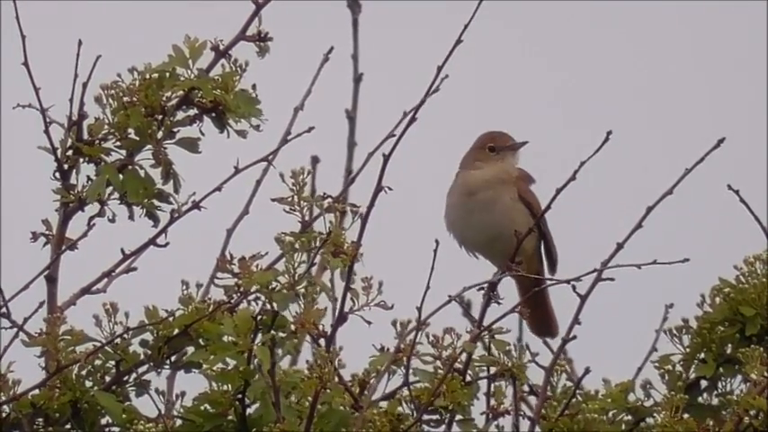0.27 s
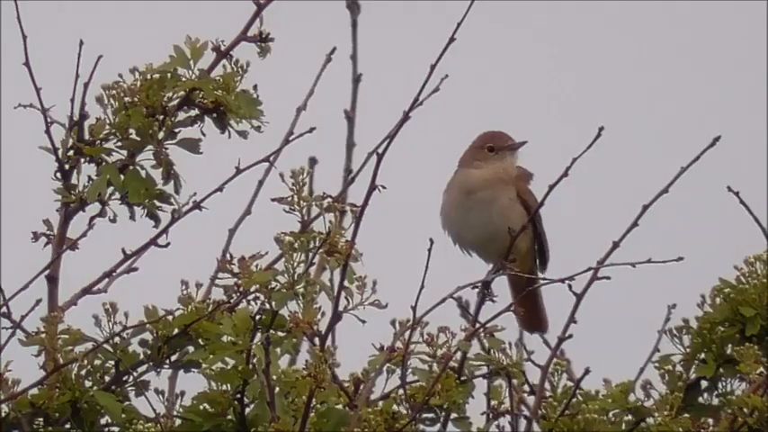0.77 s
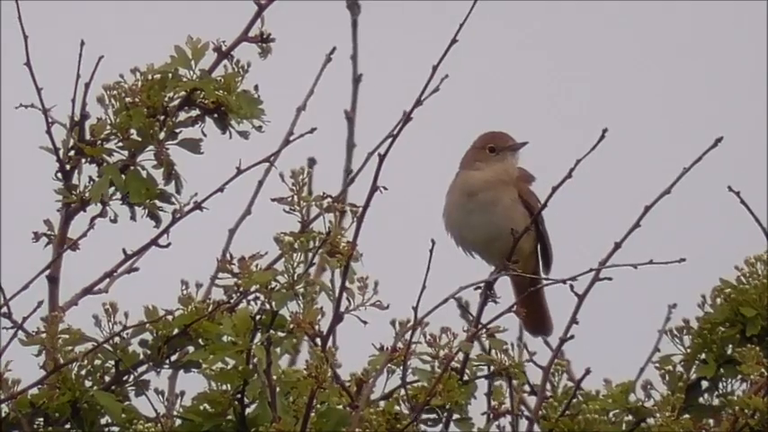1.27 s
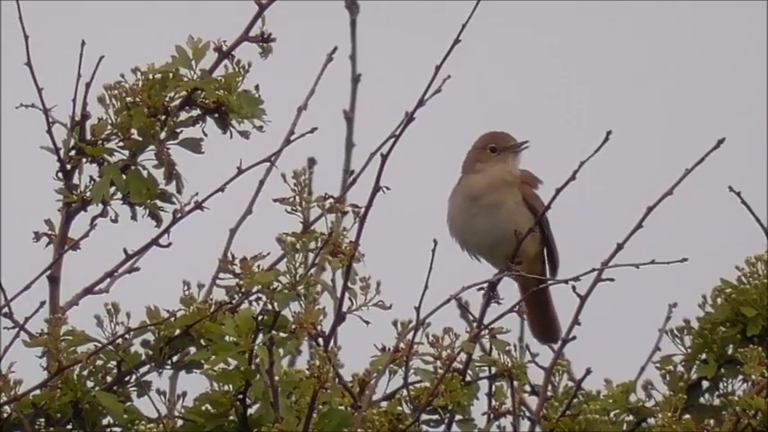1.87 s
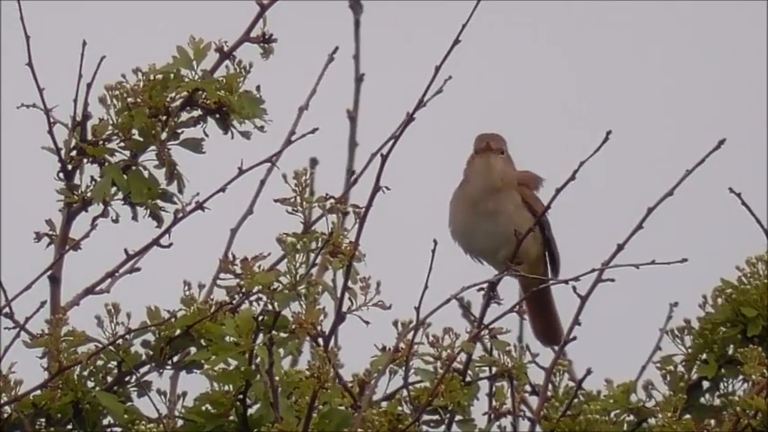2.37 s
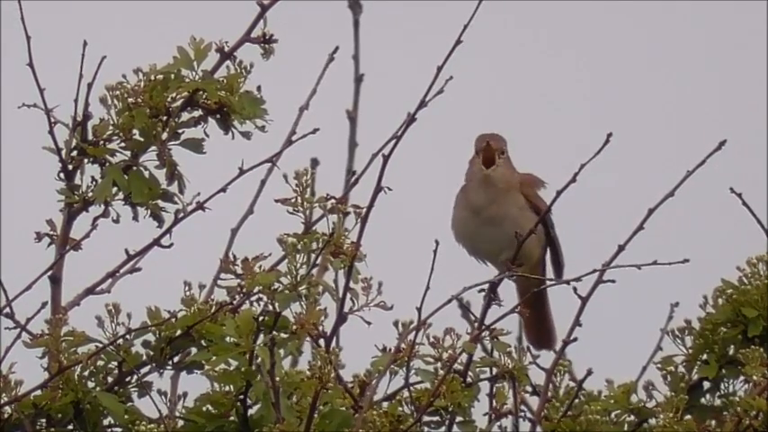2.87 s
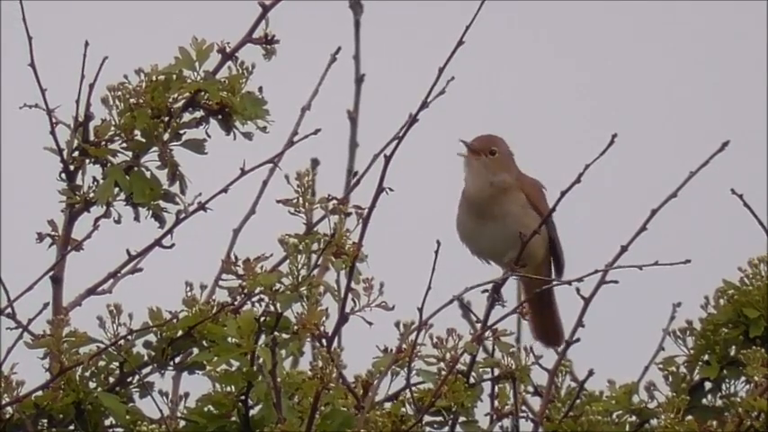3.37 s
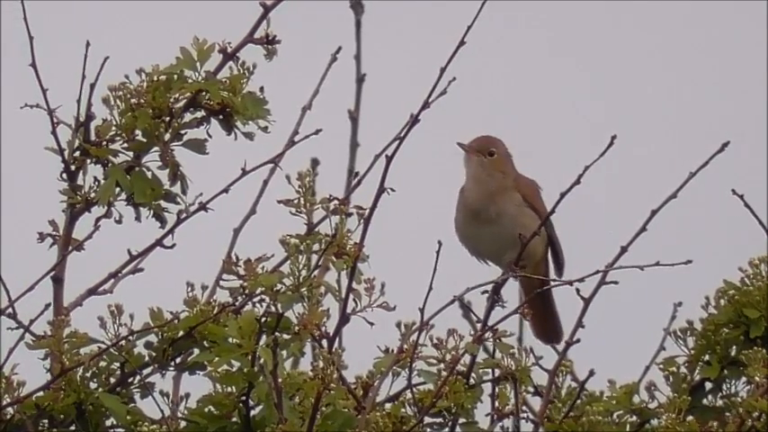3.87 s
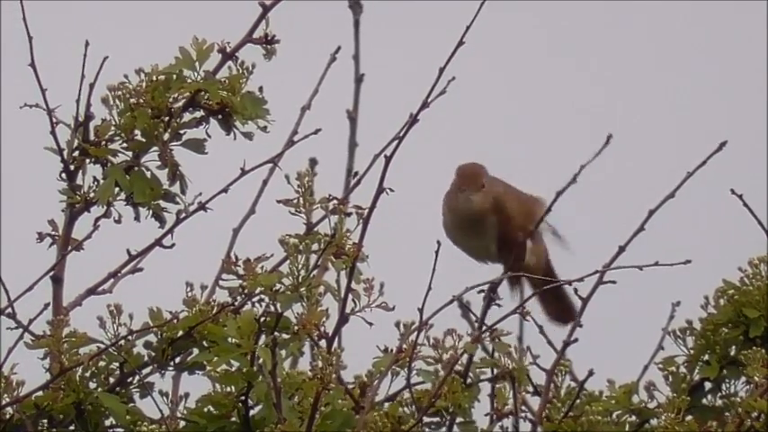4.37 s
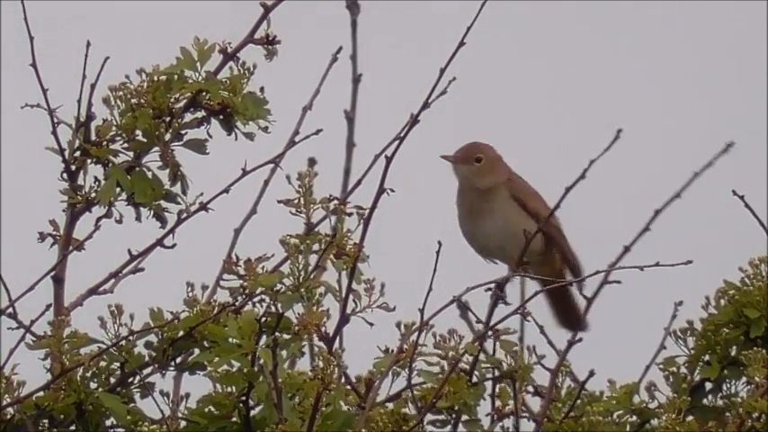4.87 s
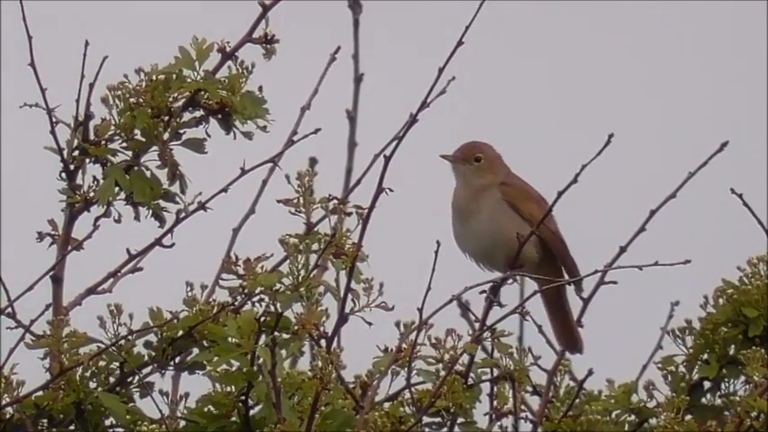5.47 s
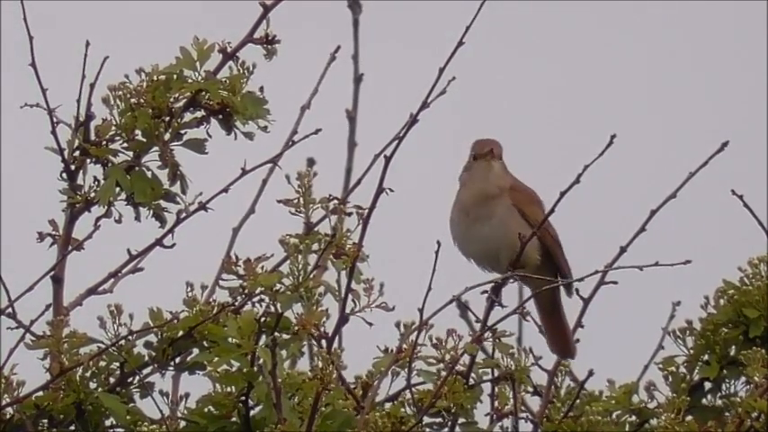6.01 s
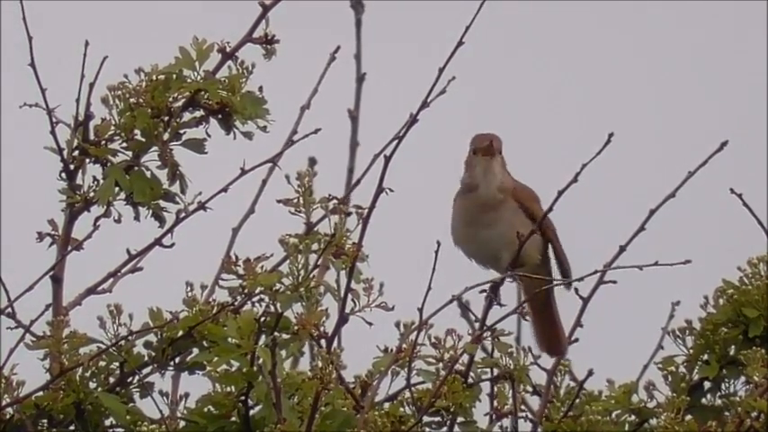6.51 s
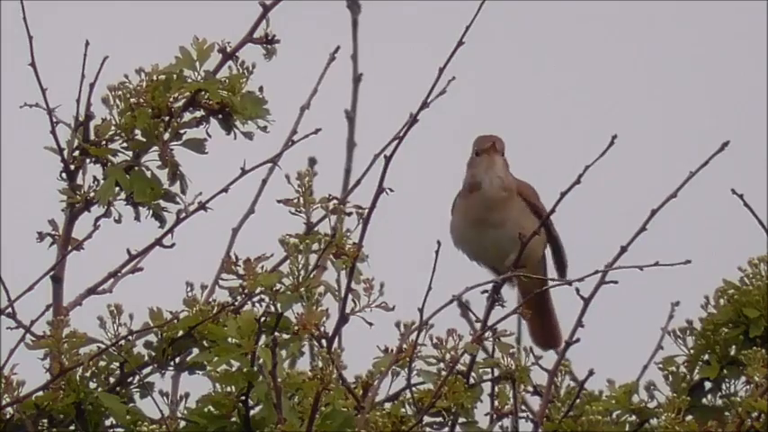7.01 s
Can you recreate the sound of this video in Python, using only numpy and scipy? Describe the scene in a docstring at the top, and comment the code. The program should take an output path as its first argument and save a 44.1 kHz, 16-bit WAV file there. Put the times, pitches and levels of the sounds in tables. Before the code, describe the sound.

A nightingale on top of a nearby hedge sings two short phrases with a pause between them. The first has a rising whistle, a rapid clicking trill and swinging notes; the second has whistles, buzzes and clipped chucks. Before it starts, a fainter warbler runs through a descending song. Distant birds chirp throughout, while gusts of wind rumble low on the microphone over a soft outdoor hiss.

```python
"""Wind rumbles on the microphone over soft hiss and distant birds; a warbler sings a falling cadence.
Then a nightingale, close by on top of a hedge, sings two phrases of whistles and buzzes,
the first with a fast trill. Each note is a gliding near-sine from the bird's syrinx;
the nightingale's beak lets overtones through, and its voice rasps when pushed.
The foliage scatters every note."""
import sys
import numpy as np
from scipy import signal
from scipy.fft import rfft, irfft
from scipy.io import wavfile
from scipy.ndimage import uniform_filter1d

SR = 44100
rng = np.random.default_rng(int(sys.argv[2]) if len(sys.argv) > 2 else 0)


def bounce(signal):
    """Save signal as a 16-bit WAV file at the path given by the first command-line argument."""
    frames = np.transpose(np.atleast_2d(signal))
    limited = np.clip(frames, -1, 1)
    pcm = np.round(limited * 32767).astype(np.int16)
    wavfile.write(sys.argv[1], SR, pcm)


N = 319725
TIME = np.arange(N) / SR


def amp(db):
    """Decibels to gain."""
    return 10 ** (np.asarray(db) / 20)


def unit_rms(x):
    """Scale to unit power."""
    return x / np.sqrt(np.mean(x ** 2) + 1e-20)


def at_hz(points, hz, column=1):
    """Read a table column along log frequency."""
    table = np.array(points, float)
    return np.interp(np.log(np.maximum(hz, 1)), np.log(table[:, 0]), table[:, column])


def add(track, start_s, sound):
    """Mix a sound into a track."""
    i = int(np.clip(round(start_s * SR), 0, N))
    track[i:i + len(sound)] += sound[:N - i]


def drift(rate_hz, size):
    """Smooth random wavering, spread about 1."""
    steps = np.arange(size) * rate_hz / SR
    return np.interp(steps, np.arange(4000), rng.standard_normal(4000))


def noise(spectrum, channels):
    """Independent noises of one colour, falling 15 dB per octave beyond its ends."""
    hz = np.maximum(np.arange(N // 2 + 1) * SR / N, 1)
    octaves_outside = np.abs(np.log2(hz / np.clip(hz, spectrum[0][0], spectrum[-1][0])))
    colour = amp(at_hz(spectrum, hz) - 15 * octaves_outside)
    return unit_rms(irfft(rfft(rng.standard_normal((channels, N))) * colour, N))


def course(length_s):
    """Share of a note gone by, per sample."""
    return np.linspace(0, 1, int(length_s * SR))


def fade(size, edge_s):
    """Equal soft onset and ending."""
    i = np.arange(size)
    return np.sin(np.pi / 2 * np.clip(np.minimum(i, i[::-1]) / (edge_s * SR), 0, 1)) ** 2


def swell(length_s, attack_s, release_s):
    """Attack, hold, release."""
    t = course(length_s) * length_s
    attack = np.sin(np.pi / 2 * np.clip(t / attack_s, 0, 1))
    release = np.sin(np.pi / 2 * np.clip((length_s - t) / release_s, 0, 1))
    return (attack * release) ** 2


def fall(length_s, from_hz, to_hz, settling):
    """Pitch that drops fast, then settles."""
    return to_hz + (from_hz - to_hz) * (1 - course(length_s)) ** settling


def phase_of(pitch_hz, jitter):
    """Phase of a slightly unsteady oscillator."""
    return 2 * np.pi * np.cumsum(pitch_hz * (1 + jitter * drift(900, len(pitch_hz)))) / SR


def treble_limit(hz):
    """Gain that fades an overtone out from 15 to 17 kHz."""
    return np.clip((17000 - hz) / 2000, 0, 1)


def call(length_s, from_hz, to_hz, rate_hz, swing, jitter=0.0071):
    """A small bird's glide with vibrato."""
    size = int(length_s * SR)
    vibrato = 1 + swing * np.cos(2 * np.pi * rate_hz * np.arange(size) / SR)
    pitch = np.geomspace(from_hz, to_hz, size) * vibrato
    return np.sin(phase_of(pitch, jitter)) * fade(size, length_s / 3)


# rumble spectrum: frequency_hz, relative_density_db
WIND_SPECTRUM = [(13, -50), (22, -28.5), (75, -1), (140, 1), (252, -7.5), (900, -42.5), (1170, -53.5),
                 (1980, -120)]
# rumble balance: time_s, low_relative_db, upper_relative_db
WIND_BALANCE = [(0.0, -33, -52), (0.16, -33, -47), (2.5, -38, -53), (3.37, -29, -46), (3.45, -34, -53),
                (4.93, -41, -56), (5.33, -35, -50), (6.84, -36, -53), (7.25, -31, -45)]
# gust strength: time_s, relative_level_db
WIND_GUSTS = [(0.0, -33.5), (0.28, -32), (0.32, -36.5), (0.55, -33.5), (1.17, -32.5), (1.19, -40.5),
              (1.45, -32.5), (1.84, -38), (1.88, -44.5), (1.96, -37), (2.22, -41), (2.42, -33),
              (2.52, -40.5), (2.56, -33), (2.6, -40.5), (2.71, -33.5), (2.77, -40.5), (2.97, -29.5),
              (3.01, -40.5), (3.13, -26), (3.71, -37.5), (3.86, -31.5), (3.94, -44), (4.02, -36.5),
              (4.64, -40), (4.76, -46.5), (5.23, -33), (5.27, -38.5), (5.31, -30), (5.39, -39.5),
              (5.47, -28.5), (5.59, -44.5), (5.73, -31), (5.77, -41.5), (5.88, -32), (5.94, -40.5),
              (6.0, -33), (6.06, -40.5), (6.14, -31.5), (6.24, -43), (6.3, -30), (6.42, -46.5),
              (6.44, -31.5), (6.6, -36.5), (6.64, -28), (6.68, -37), (7.19, -31.5), (7.25, -32.5)]

def wind(gain_db=11, pan_db=-5, own_db=-15, split_hz=280, lump_hz=30, lump_db=1.15, upper_lump_db=4):
    """Eddies push the two capsules in opposite senses; the upper rumble comes in lumps."""
    shared, left, right = noise(WIND_SPECTRUM, channels=3)
    opposed = shared * amp([[pan_db / 2], [-pan_db / 2]]) * [[1], [-1]]
    rumble = opposed + amp(own_db) * np.array([left, right])
    low = signal.sosfiltfilt(signal.butter(2, split_hz, fs=SR, output="sos"), rumble)
    time_s, low_db, upper_db = np.transpose(WIND_BALANCE)
    tilt_db = upper_db - low_db
    bright_db = np.interp(TIME, time_s, tilt_db - tilt_db.mean()) + upper_lump_db * drift(lump_hz, N)
    rumble = low + (rumble - low) * amp(bright_db)
    running_rms = np.sqrt(uniform_filter1d(np.mean(rumble ** 2, axis=0), int(.08 * SR)))
    gust_db = np.interp(TIME, *np.transpose(WIND_GUSTS))
    return rumble / running_rms * amp(gain_db + gust_db + lump_db * drift(lump_hz, N))


# hiss spectrum: frequency_hz, relative_density_db
AIR_SPECTRUM = [(280, -29), (480, -2.5), (571, -3), (701, -10), (1310, -14), (1700, -19), (2020, -18.5),
                (2630, -24), (3670, -16.5), (4500, -18.5), (6200, -29), (8060, -24.5), (8420, -24.5),
                (12600, -24), (15500, -29.5)]

def air(shared_db=-61, own_db=-60, whine_db=-76, whine_hz=7880):
    """Soft outdoor hiss with a faint high whine."""
    shared, left, right = noise(AIR_SPECTRUM, channels=3)
    hiss = amp(shared_db) * shared + amp(own_db) * np.array([left, right])
    return hiss + amp(whine_db) * np.sin(phase_of(np.full(N, whine_hz), jitter=.01))


def chorus(count=210, low_hz=2400, high_hz=5000, relative_db=-61, spread_db=8, max_glide_octaves=.6):
    """Many faint birds give arched glides at random."""
    out = np.zeros(N)
    for when, height, slope, duration, loud in rng.random((count, 5)):
        hz = low_hz * (high_hz / low_hz) ** height
        bend = 2 ** (max_glide_octaves * (slope - .5))
        length_s = .04 + .08 * duration
        note = call(length_s, hz / bend, hz * bend, rate_hz=1 / length_s, swing=-.0498)
        add(out, when * N / SR, amp(relative_db + spread_db * (loud - .5)) * note)
    return out


def chatter(count=90, spacing_s=.081, length_s=.0287, pitch_hz=2100, relative_db=-56):
    """One faint bird repeats a low note unevenly."""
    out = np.zeros(N)
    for k, (late, height, loud) in enumerate(rng.standard_normal((count, 3))):
        hz = pitch_hz * (1 + .0425 * height)
        note = call(length_s, hz * 1.05, hz / 1.05, rate_hz=15, swing=.0059)
        add(out, k * spacing_s + .017 * late, amp(relative_db + 3 * loud) * note)
    return out


# repeated chirps: start_s, count, spacing_s, length_s, from_hz, to_hz, relative_level_db
FAR_CHIRPS = [(.111, 4, .0765, 0.035, 3200, 1700, -55.5), (4.402, 3, 0.15, .082, 2900, 4950, -57.5),
              (4.392, 3, .164, .032, 2500, 1800, -52.5)]

def far_chirps():
    """Distant birds each repeat one glide."""
    out = np.zeros(N)
    for start_s, count, spacing_s, length_s, from_hz, to_hz, db in FAR_CHIRPS:
        for k in range(count):
            chirp = call(length_s, from_hz, to_hz, rate_hz=10.4, swing=.017)
            add(out, start_s + k * spacing_s, amp(db) * chirp)
    return out


# clicks and knocks: start_s, band_hz, level_db, decay_s
TICK_BURSTS = [(.202, 945, -40, 0.0037), (.926, 6550, -44, 0.0009), (2.662, 10000, -49, .001),
               (4.793, 970, -38.5, 0.0047), (5.734, 4330, -48, .004), (6.524, 9000, -52, .001),
               (6.532, 9000, -53, .001)]

def ticks():
    """Clicks and soft knocks: fast-decaying bands of noise."""
    out, t = np.zeros(N), np.arange(SR // 20) / SR
    for start_s, hz, db, decay_s in TICK_BURSTS:
        band = signal.butter(2, [hz / 1.4, hz * 1.07], "band", fs=SR, output="sos")
        burst = unit_rms(signal.sosfilt(band, rng.standard_normal(len(t))))
        add(out, start_s, amp(db) * burst * np.exp(-t / decay_s))
    return out


def contour(points, edge_s):
    """Start, pitch and gain of a note; the muscles round off the corners of the pitch."""
    time_s, hz, db = np.transpose(points)
    t = np.arange(time_s[0] - .001, time_s[-1] + .001, 1 / SR)
    rounding_samples = int(.25 * np.median(np.diff(time_s)) * SR)
    pitch = uniform_filter1d(np.interp(t, time_s, hz), rounding_samples, mode="nearest")
    return t[0], pitch, amp(np.interp(t, time_s, db)) * fade(len(t), edge_s)


# falling slides: start_s, length_s, from_hz, to_hz, relative_level_db
WARBLER_SLIDES = [(.24, .075, 6470, 4800, -65), (.388, 0.083, 6860, 4700, -56),
                  (0.539, 0.082, 7070, 4720, -53), (1.652, .018, 7300, 4000, -55),
                  (1.87, .052, 4060, 2880, -52), (2.086, .026, 4480, 4140, -46.5),
                  (2.166, 0.056, 4470, 2820, -48.5)]
# repeated hooked note: start_s, relative_level_db
WARBLER_HOOKS = [(0.698, -46), (0.81, -44), (.923, -42), (1.04, -42), (1.151, -42.5)]
# course of one hook: length_share, pitch_hz, relative_level_db
HOOK_SHAPE = [(0, 4880, -12), (.22, 5030, -5), (.42, 5240, -5), (.58, 4970, -1), (.8, 3720, -4),
              (1, 3150, -15)]
# held, then rising: start_s, length_s, held_share, low_hz, high_hz, hold_relative_db, swoop_relative_db
WARBLER_SWOOPS = [(1.271, 0.12, 0.37, 3610, 6220, -49, -46), (1.457, 0.12, 0.33, 3640, 6200, -48, -50),
                  (1.677, 0.041, 0, 4170, 6060, -51, -47), (1.788, 0.11, 0.23, 3030, 3930, -56.5, -48.5),
                  (1.997, 0.098, 0.5, 3050, 4820, -54, -46.5), (2.111, 0.018, 0.022, 4000, 5350, -52, -44),
                  (2.391, .108, .75, 3050, 4500, -57.5, -49.5)]

def warbler(hook_s=.06, swoop_curve=1.4, swoop_edge_s=.0099, flicker_db=2.5):
    """A cadence of pure notes: slides, a repeated hook, then upward swoops among more slides."""
    notes = []
    for start_s, length_s, from_hz, to_hz, db in WARBLER_SLIDES:
        gain = amp(db) * swell(length_s, attack_s=.43 * length_s, release_s=.19 * length_s)
        notes.append((start_s, fall(length_s, from_hz, to_hz, settling=1.1), gain))
    for start_s, db in WARBLER_HOOKS:
        points = [(start_s + share * hook_s, hz, db + shape_db) for share, hz, shape_db in HOOK_SHAPE]
        notes.append(contour(points, edge_s=.0032))
    for start_s, length_s, held, low_hz, high_hz, hold_db, swoop_db in WARBLER_SWOOPS:
        rise = np.clip((course(length_s) - held) / (1 - held), 0, 1)
        db = hold_db + (swoop_db - hold_db) * np.sqrt(rise)
        gain = amp(db) * swell(length_s, swoop_edge_s, swoop_edge_s)
        notes.append((start_s, low_hz + (high_hz - low_hz) * rise ** swoop_curve, gain))
    out = np.zeros(N)
    for start_s, pitch, gain in notes:
        flicker = amp(flicker_db * drift(112, len(pitch)))
        add(out, start_s, gain * flicker * np.sin(phase_of(pitch, jitter=.0093)))
    return out


# runs of pips: start_s, count, spacing_s, first_hz, last_hz, relative_level_db
FAR_PIPS = [(.955, 4, 0.082, 8930, 8850, -55.5), (2.508, 2, 0.063, 8700, 8770, -50.5),
            (4.204, 8, .059, 8780, 8080, -57.5), (4.681, 4, .036, 7170, 6730, -59)]

def far_pips(length_s=.018, spread_db=2):
    """A small bird's runs of thin, high pips."""
    out = np.zeros(N)
    for start_s, count, spacing_s, first_hz, last_hz, db in FAR_PIPS:
        for k, hz in enumerate(np.linspace(first_hz, last_hz, count)):
            gain = amp(db + spread_db * rng.standard_normal())
            pip = call(length_s, hz * 1.015, hz / 1.015, rate_hz=172, swing=.026)
            add(out, start_s + k * spacing_s, gain * pip)
    return out


# distant whistles: start_s, length_s, from_hz, to_hz, relative_level_db
FAR_WHISTLE_NOTES = [(1.383, 0.28, 3020, 2430, -58.5), (1.696, .06, 2490, 2720, -53.5),
                     (1.75, .29, 2746, 2910, -59), (1.78, 0.1, 3650, 3760, -56),
                     (2.17, .1, 3645, 3674, -52), (2.474, 0.06, 4460, 4080, -49.5),
                     (2.61, .079, 3100, 2960, -54), (3.555, .5, 2397, 2177, -59.5),
                     (3.878, 0.33, 2680, 2904, -58.5), (3.929, 0.097, 5000, 5400, -59),
                     (4.149, .14, 3550, 3160, -61), (4.364, 0.33, 2980, 2945, -54.5),
                     (5.04, .1, 3113, 3070, -59.5), (5.44, .11, 2930, 2610, -56),
                     (5.763, .16, 2715, 2790, -60)]

def far_whistles():
    """Drawn-out, nearly level whistles from other bushes."""
    out = np.zeros(N)
    for start_s, length_s, from_hz, to_hz, db in FAR_WHISTLE_NOTES:
        whistle = call(length_s, from_hz, to_hz, rate_hz=6.3, swing=.0047, jitter=.0065)
        add(out, start_s, amp(db) * whistle)
    return out


# distant warbles: start_s, length_s, from_hz, to_hz, relative_level_db
FAR_WARBLES = [(2.24, 0.12, 1482, 1440, -47), (5.87, .13, 1560, 1290, -46.5)]

def far_warbles(rate_hz=42, swing=.079, fundamental_db=-6.5, throb_db=5):
    """A low tone and its louder octave throb in pitch and level."""
    out = np.zeros(N)
    for start_s, length_s, from_hz, to_hz, db in FAR_WARBLES:
        dip_db = throb_db * (np.cos(2 * np.pi * rate_hz * length_s * course(length_s)) - 1)
        for k, partial_db in [(1, fundamental_db), (2, 0)]:
            partial = call(length_s, k * from_hz, k * to_hz, rate_hz, swing)
            add(out, start_s, amp(db + partial_db + dip_db) * partial)
    return out


# overtones through the open beak: pitch_hz, second_harmonic_db, third_harmonic_db
BEAK_OVERTONES = [(1500, -46, -46), (2800, -46, -39), (3450, -44, -25), (4100, -29, -17), (4700, -10, -26),
                  (5800, -6, -40), (7600, -34, -50)]

def syrinx(pitch, db, flicker_db=1, beak_hz=11300, beak_width_hz=1900, upper_harmonics_db=-30):
    """The nightingale's clear voice: a near sine whose overtones come out near the beak's resonance."""
    gain = amp(db + flicker_db * drift(175, len(pitch)))
    phase = phase_of(pitch, jitter=.0038)
    tone = np.sin(phase)
    for k in (2, 3):
        harmonic_db = at_hz(BEAK_OVERTONES, pitch, column=k - 1)
        tone += treble_limit(k * pitch) * amp(harmonic_db) * np.sin(k * phase)
    for k in (4, 5, 6):
        resonance = np.exp(-((k * pitch - beak_hz) / beak_width_hz) ** 2)
        tone += amp(upper_harmonics_db) * resonance * np.sin(k * phase)
    return gain * tone


# thin whistles opening each phrase: start_s, length_s, from_hz, to_hz, level_db
OPENING_WHISTLES = [(2.456, 0.086, 8540, 7690, -39.5), (6.114, .08, 8440, 7400, -45)]
# short chucks near the end: start_s, length_s, from_hz, to_hz, level_db
CLOSING_CHUCKS = [(6.659, 0.029, 4090, 2050, -32.5), (6.704, 0.033, 2850, 2545, -31.5),
                  (6.933, 0.019, 2030, 1410, -37), (7.0545, 0.013, 2430, 1490, -35),
                  (7.085, 0.0167, 2100, 1410, -39), (7.1975, .015, 2470, 1530, -35.5),
                  (7.2265, 0.011, 2100, 1370, -37)]

def falling_notes(notes, settling, edge_s):
    """Nightingale notes that sink towards their last pitch."""
    out = np.zeros(N)
    for start_s, length_s, from_hz, to_hz, db in notes:
        pitch = fall(length_s, from_hz, to_hz, settling)
        add(out, start_s, syrinx(pitch, db) * swell(length_s, edge_s, edge_s))
    return out


# breaking voice: frequency_hz, relative_density_db
RASP_SPECTRUM = [(2500, -17), (3500, -2.5), (5500, -0.5), (7200, -5.5), (10500, -4.5), (13000, -3.5),
                 (15500, -26)]
# buzzes: start_s, length_s, from_hz, to_hz, relative_level_db,
# flutter_hz, swing_share, throb_db, octave_db, rasp_db
BUZZ_NOTES = [(2.609, 0.0257, 5560, 5080, -33, 145, 0.058, 4, -9, -17),
              (3.744, .032, 6350, 4740, -28, 41, .005, 1.5, -5.5, -19),
              (3.737, .014, 3500, 5300, -37.5, 130, .02, 0, 0, 3.5),
              (3.381, 0.0136, 4400, 5600, -40.5, 134, .1, 3, -2, 1.5),
              (6.263, 0.033, 5760, 5050, -35.5, 134, .06, 6, -11, -16),
              (6.651, .016, 4800, 5500, -43.5, 130, .1, 3.5, 0.5, 0),
              (6.788, 0.05, 5900, 5400, -37.5, 105, .11, 6, 5.5, 3),
              (7.031, .011, 6100, 4500, -37.5, 203, .08, 2.5, -4, 4),
              (7.173, .013, 5500, 4200, -36, 198, 0.074, 4.5, -2, 5)]

def buzzes():
    """A fast flutter shakes pitch and level together; pushed, the voice breaks into a rasp."""
    tone, breaking = np.zeros((2, N))
    for start_s, length_s, from_hz, to_hz, db, *timbre in BUZZ_NOTES:
        flutter_hz, swing, throb_db, octave_db, rasp_db = timbre
        size = int(length_s * SR)
        flutter = np.cos(2 * np.pi * flutter_hz * np.arange(size) / SR)
        phase = phase_of(np.linspace(from_hz, to_hz, size) * (1 + swing * flutter), jitter=.031)
        envelope = np.sin(np.pi * (np.arange(size) + .5) / size) ** .33
        gain = amp(db - throb_db * flutter) * envelope
        add(tone, start_s, gain * (np.sin(phase) + amp(octave_db) * np.sin(2 * phase)))
        add(breaking, start_s, gain * amp(rasp_db) / np.sqrt(2))
    return tone + breaking * noise(RASP_SPECTRUM, channels=1)[0]


# soft notes: start_s, length_s, from_hz, to_hz, level_db, throb_hz
SOFT_NOTES = [(6.589, 0.024, 1510, 1420, -43.5, 110), (6.12, 0.098, 6700, 5700, -54.5, 11.5),
              (2.7, 0.091, 6300, 5500, -53, 13)]

def undertones():
    """A soft second voice beside the nightingale's whistles, and a low purr."""
    out = np.zeros(N)
    for start_s, length_s, from_hz, to_hz, db, throb_hz in SOFT_NOTES:
        t = np.arange(int(length_s * SR)) / SR
        tone = np.sin(phase_of(np.geomspace(from_hz, to_hz, len(t)), jitter=.009))
        throb = np.sin(np.pi * throb_hz * t) ** 2
        add(out, start_s, amp(db) * tone * throb * fade(len(t), edge_s=.0055))
    return out


# rising whistles: start_s, length_s, low_hz, high_hz, level_db, lateness_exponent
SLUR_NOTES = [(2.714, 0.12, 2777, 4080, -26, 1.68), (6.369, 0.12, 2858, 4250, -28.5, 1.9)]

def slurs():
    """Nightingale whistles that swell as they bend upwards."""
    out = np.zeros(N)
    for start_s, length_s, low_hz, high_hz, db, lateness in SLUR_NOTES:
        pitch = low_hz + (high_hz - low_hz) * np.sin(np.pi / 2 * course(length_s) ** lateness) ** 2
        add(out, start_s, syrinx(pitch, db) * swell(length_s, attack_s=.064, release_s=.0079))
    return out


# upward sweeps: start_s, length_s, top_hz, relative_level_db
TRILL_SWEEPS = [(2.907, .013, 10800, -22), (2.942, 0.012, 11800, -18.5), (2.975, .012, 12250, -18),
                (3.008, .0115, 12600, -17.5), (3.041, .011, 12800, -18), (3.075, .012, 12500, -17.5),
                (3.109, 0.012, 12200, -19.5), (3.143, .013, 11660, -22)]
# effort through one sweep: length_share, fundamental_db, octave_db
SWEEP_EFFORT = [(0, -27, -28), (.15, -19.5, -20), (.33, -15.5, -17), (.48, -8.5, -26), (.66, 2.5, -40),
                (.85, 0.5, -50), (1, -13, -60)]

def trill(from_hz=3300, curve=.83, rasp_db=-20):
    """Thirty sweeps a second, each so fast it sounds like a rough click; the octave peaks first."""
    tone, effort = np.zeros((2, N))
    share, fundamental_db, octave_db = np.transpose(SWEEP_EFFORT)
    for start_s, length_s, top_hz, db in TRILL_SWEEPS:
        progress = course(length_s)
        pitch = from_hz + (top_hz - from_hz) * progress ** curve
        phase = phase_of(pitch, jitter=.012)
        envelope = amp(db) * fade(len(pitch), edge_s=.001)
        gain = envelope * amp(np.interp(progress, share, fundamental_db))
        octave_gain = envelope * amp(np.interp(progress, share, octave_db)) * treble_limit(2 * pitch)
        add(tone, start_s, gain * np.sin(phase) + octave_gain * np.sin(2 * phase))
        add(effort, start_s, gain)
    return tone + amp(rasp_db) * effort * noise(RASP_SPECTRUM, channels=1)[0]


# swinging notes: start_s, length_s, first_crest_s, period_s, low_hz, high_hz, level_db,
# narrowness_exponent, overshoot_share, attack_s
ARCH_NOTES = [(3.248, 0.081, 0.052, 0.12, 1104, 2050, -33, 3.6, 0.014, 0.025),
              (3.388, 0.096, 0.0029, .034, 2460, 3460, -26, 1.8, 0.37, 0.0054),
              (3.599, 0.093, .051, .076, 1498, 3286, -27, 1.35, 0.089, 0.0016),
              (6.887, 0.037, 0.025, 0.04, 1954, 2680, -29.5, 1.9, 0.008, .003)]

def arches(db_per_octave=12, overshoot_s=.0072, release_s=.0097):
    """The nightingale's pitch and level swing together, once or several times."""
    out = np.zeros(N)
    for start_s, length_s, crest_s, period_s, low_hz, high_hz, db, *shape in ARCH_NOTES:
        narrowness, overshoot, attack_s = shape
        t = course(length_s) * length_s
        height = np.abs(np.cos(np.pi * (t - crest_s) / period_s)) ** narrowness
        pitch = low_hz + (high_hz - low_hz) * height
        level_db = db + db_per_octave * np.log2(pitch / high_hz)
        pitch *= 1 + overshoot * np.exp(-t / overshoot_s)
        add(out, start_s, syrinx(pitch, level_db) * swell(length_s, attack_s, release_s))
    return out


# very high whips: crest_s, length_s, crest_hz, level_db
WHIP_NOTES = [(7.0252, 0.025, 13360, -23.5), (7.167, 0.0251, 13500, -23.5)]

def whips(lead_s=.0088, plunge_hz_per_s2=44e6):
    """The nightingale's pitch flies over its crest like a thrown ball and plunges ever faster."""
    out = np.zeros(N)
    for crest_s, length_s, crest_hz, db in WHIP_NOTES:
        pitch = crest_hz - plunge_hz_per_s2 * (course(length_s) * length_s - lead_s) ** 2
        add(out, crest_s - lead_s, syrinx(pitch, db) * swell(length_s, attack_s=.011, release_s=.0097))
    return out


# nightingale's direction: frequency_hz, left_minus_right_db, left_lead_rad
HEDGE_BEARING = [(1500, 8.5, -0.71), (2980, 5, -1.54), (3900, 3, -1.73), (5500, 0.5, -0.65), (7700, 7.5, 1),
                 (10000, 5, 0.51), (13000, -1.5, 0.65)]

def from_the_hedge(voice):
    """The singer sits to the left; level and phase between the capsules change with pitch."""
    hz = np.arange(N // 2 + 1) * SR / N
    pan_db, lead_rad = at_hz(HEDGE_BEARING, hz), at_hz(HEDGE_BEARING, hz, column=2)
    sides = amp(np.array([pan_db, -pan_db]) / 2)
    sides /= np.sqrt(np.mean(sides ** 2, axis=0))
    return irfft(rfft(voice) * sides * np.exp(.5j * np.array([lead_rad, -lead_rad])), N)


def foliage(x, near_db, far_db, t60_s, near_s=.01):
    """Nearby twigs scatter a note within milliseconds; bushes further off add a thin, duller tail."""
    t = np.arange(int(.8 * SR)) / SR
    near, far = rng.standard_normal((2, 2, len(t)))
    near = near * np.exp(-t / near_s) * (t > .001)
    far = signal.lfilter(*signal.butter(1, 5000, fs=SR), far) * amp(-60 * t / t60_s) * (t > .008)
    near /= np.linalg.norm(near, axis=1, keepdims=True)
    far /= np.linalg.norm(far, axis=1, keepdims=True)
    echoes = amp(near_db) * near + amp(far_db) * far
    return x + signal.fftconvolve(x * np.ones((2, 1)), echoes, axes=1)[:, :N]


def scene():
    """The near nightingale, the birds behind it, ticks, wind and air, in stereo."""
    voice = slurs() + arches() + whips()
    voice += falling_notes(CLOSING_CHUCKS, settling=1.8, edge_s=.0023)
    voice += falling_notes(OPENING_WHISTLES, settling=1.3, edge_s=.032)
    voice += amp(-1.85) * trill() + amp(-4) * buzzes() + undertones()
    birds = foliage(from_the_hedge(voice), near_db=-12, far_db=-21, t60_s=.45, near_s=.016)
    neighbour = foliage(warbler(), near_db=-2.5, far_db=-14, t60_s=1, near_s=.014)
    far_calls = far_whistles() + far_warbles() + far_chirps() + far_pips()
    distant = foliage(far_calls, near_db=-1, far_db=-7, t60_s=.61)
    woodland = foliage(chorus() + chatter(), near_db=-2, far_db=-4, t60_s=.7)
    for layer, gain_db, left_db in [(neighbour, -.5, .6), (distant, -2.5, .5), (woodland, -7, 1.5)]:
        birds += layer * amp([[gain_db + left_db], [gain_db - left_db]])
    return birds + ticks() + wind() + air()


def record(dry):
    """Steep low-pass at 15.75 kHz."""
    return signal.sosfilt(signal.ellip(10, .1, 80, 15750, fs=SR, output="sos"), dry)


dry = scene()
out = record(dry)
bounce(out)
```